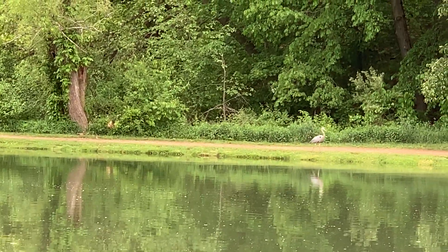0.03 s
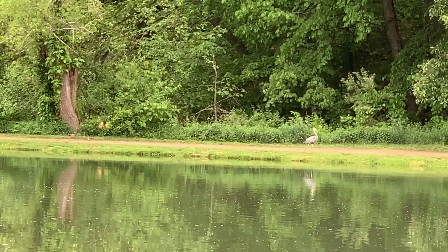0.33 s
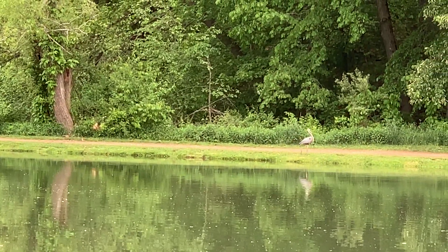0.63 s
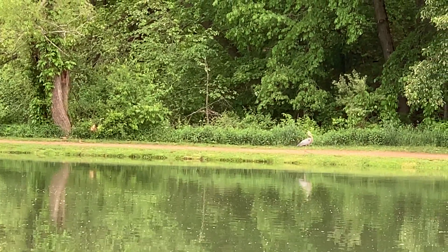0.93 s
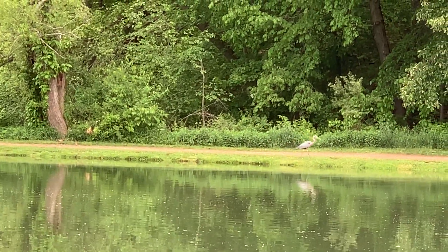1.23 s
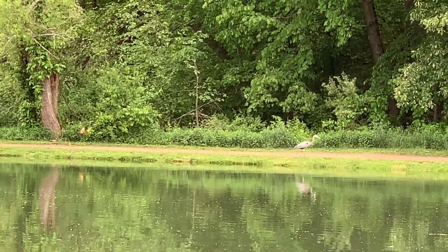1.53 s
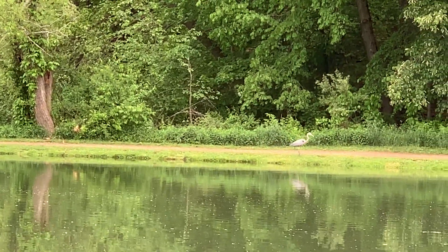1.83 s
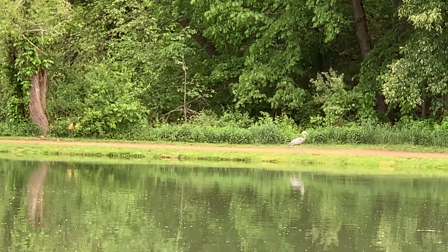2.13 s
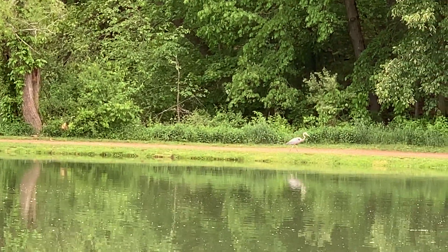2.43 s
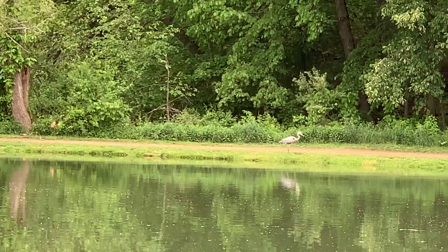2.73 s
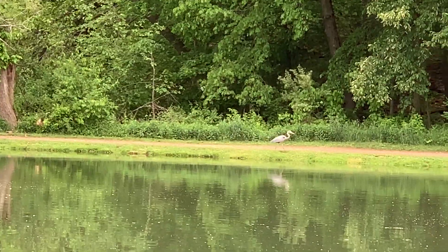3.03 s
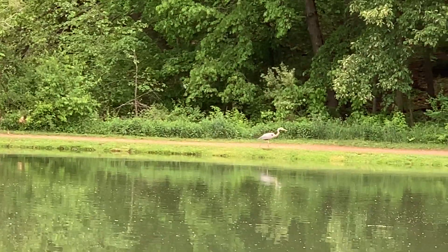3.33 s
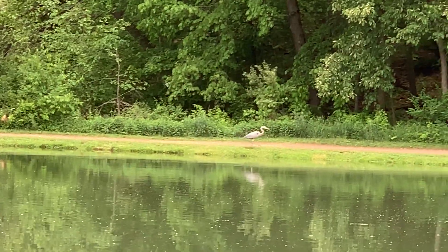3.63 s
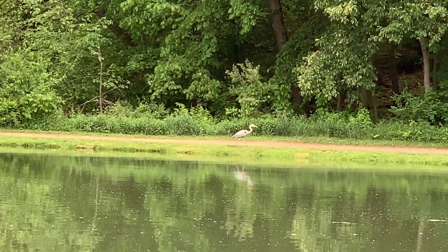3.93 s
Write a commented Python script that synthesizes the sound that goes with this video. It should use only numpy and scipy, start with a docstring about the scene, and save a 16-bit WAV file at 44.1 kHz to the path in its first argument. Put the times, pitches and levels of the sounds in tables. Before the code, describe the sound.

Faint woodland birdsong and a single sharp nearby chirp above soft, far-off traffic rumble.

```python
"""A quiet pond at the edge of a wood, with the low rumble of a distant town and a faint engine drone.
Birds whistle, twitter and trill deep in the trees, and a songbird slurs a short phrase in gliding tones.
One close bird gives a sharp chip, sounding both sides of its voice box at once.
Leaves and trunks scatter every call; two closely spaced microphones pick it all up."""
import sys
import numpy as np
from scipy import signal
from scipy.fft import rfft, irfft
from scipy.io import wavfile
from scipy.ndimage import uniform_filter1d

SR = 44100
rng = np.random.default_rng(int(sys.argv[2]) if len(sys.argv) > 2 else 0)


def transcribe(u):
    """Save the signal u as a 16-bit wav file named by the first command-line argument.

    u: samples, shape (n,) or (channels, n), limited to [-1, 1]; the rate is SR.
    q: integer samples, one column per channel.
    """
    v = np.clip(np.atleast_2d(u).T, -1, 1)
    q = np.round(v * 32767).astype(np.int16)
    wavfile.write(sys.argv[1], SR, q)


N = 4 * SR
TIME = np.arange(N) / SR


def undb(db):
    """Decibels to gain."""
    return 10 ** (np.asarray(db) / 20)


def drift(rate_hz):
    """Smooth random drift with a spread near 1."""
    hold = max(int(SR / rate_hz), 1)
    steps = np.repeat(rng.standard_normal(N // hold + 1), hold)
    return 1.3 * uniform_filter1d(uniform_filter1d(steps, hold), hold)[:N]


def sine(hz, db):
    """A tone that follows a pitch curve, at an RMS level in dB."""
    return np.sqrt(2) * undb(db) * np.sin(2 * np.pi * np.cumsum(hz) / SR)


def swell(start, length):
    """A round-shouldered fade in and out."""
    progress = np.clip((TIME - start) / length, 0, 1)
    return np.sqrt(np.abs(np.sin(np.pi * progress)))


def over_hz(points):
    """A table read at every frequency, on a log axis."""
    hz, value = np.array(points).T
    return np.interp(np.log(np.arange(N // 2 + 1) * SR / N + 1e-9), np.log(hz), value)


def place(x, lag_s, pan_db=0):
    """A direction: positive values reach the right microphone later and weaker."""
    return np.array([x * undb(pan_db / 2), np.roll(x, round(lag_s * SR)) * undb(-pan_db / 2)])


def scatter(x, t60_s, onset_s):
    """Countless small echoes from leaves and trunks, different at each microphone."""
    envelope = np.exp(-np.log(1000) * TIME / t60_s) * (1 - np.exp(-TIME / onset_s))
    echoes = rng.standard_normal((2, N)) * envelope
    echoes /= np.sqrt(np.sum(echoes ** 2, axis=1, keepdims=True))
    return signal.fftconvolve(x[None], echoes, axes=1)[:, :N]


# Stereo width of the beds. Each row: frequency in Hz, left-right correlation.
STEREO_LIKENESS = [(60, 0.92), (110, 0.8), (200, 0.51), (320, 0.31), (480, -0.28), (700, -0.069),
                   (950, -0.54), (1450, -0.53), (1900, 0.18), (2600, -0.15), (6000, -0.046)]

def wash(spectrum):
    """Stereo noise of a given colour at unit level, arriving from all around."""
    alike = over_hz(STEREO_LIKENESS)
    coloured = rfft(rng.standard_normal((2, N))) * undb(over_hz(spectrum))
    mid, side = coloured * np.sqrt([1 + alike, 1 - alike])
    bed = irfft(np.array([mid + side, mid - side]), N)
    return bed / bed.std()


# Colour of the air bed. Each row: frequency in Hz, relative level in dB.
AIR_COLOUR = [(150, -11.5), (400, -1), (600, -1.5), (830, 0.5), (1300, -3.5), (1800, -9.5), (2500, -12.5),
              (3500, -17.5), (5000, -25), (7000, -32.5), (9500, -34), (13500, -35.5), (16000, -20.5)]

def air():
    """The smooth hush over the pond, gently rising and falling."""
    return wash(AIR_COLOUR) * undb(-61 + 1.5 * drift(2.08))


def engine_tone(hz, db):
    """One engine line, wavering in pitch and level on its long way."""
    wavering_db = db + 3.63 * drift(4.026)
    return sine(hz * (1 + 0.00592 * drift(3.002)), wavering_db)


# The constant low drone. Each row: pitch in Hz, relative level in dB.
ENGINE_DRONE = [(61.5, -65), (80.7, -53.5), (102, -61)]
# A higher hum that comes and goes. Each row: start and end in seconds, pitch in Hz, relative level in dB.
ENGINE_HUM = [(0.45, 3.3, 257, -66), (2.2, 3.45, 270, -63.5), (0.57, 3.2, 298, -70), (3.7, 3.72, 230, -66)]

def engines():
    """Distant engines: a low drone with hums fading in and out above it."""
    drone = sum(engine_tone(hz, db) for hz, db in ENGINE_DRONE)
    hum = sum(engine_tone(hz, db) * swell(start, end - start) for start, end, hz, db in ENGINE_HUM)
    return drone + hum


# Colour of the traffic bed. Each row: frequency in Hz, relative level in dB.
RUMBLE_COLOUR = [(15, -51), (25, -22.5), (40, -13), (58, 1.5), (76, -2), (104, -2.5), (135, -8.5),
                 (175, -13.5), (200, -10.5), (232, -16), (268, -14.5), (335, -23), (480, -27), (900, -66.5)]
# Fader ride on the whole town. Each row: time in seconds, gain in dB.
TOWN_FADER = [(0, -2), (.7, -1), (1.1, 0.8), (1.5, 0), (2, 0), (2.8, -0.7), (3.4, -0.7), (4, -1)]

def town():
    """Far traffic rumbling under the engines, a little to the right."""
    drone = engines()
    rumble = wash(RUMBLE_COLOUR) * undb(-46.5 + 1.25 * drift(3.01))
    fader = undb(np.interp(TIME, *np.array(TOWN_FADER).T))
    pan = undb([[-1.75], [1.75]])
    return (rumble + drone) * fader * pan


def sing(notes, waver):
    """Bird notes that swell and fade while the pitch bends through three points and flutters."""
    voice = np.zeros(N)
    flutter = 1 + waver * drift(300)
    for start, length, first, middle, last, db in notes:
        on = (TIME >= start) & (TIME < start + length)
        progress = (TIME[on] - start) / length
        bend = np.polyfit([0, .5, 1], [first, middle, last], 2)
        hz = np.polyval(bend, progress) * flutter[on]
        voice[on] += np.sin(np.pi * progress) * sine(hz, db)
    return voice


# Rapid far trills; the first run is a broad, fluttering wash of echo around the songbird's phrase.
# Each row: start and length in seconds, lowest and highest pitch in Hz, relative level in dB.
FLUTTER_RUNS = [(0.127, 0.24, 2540, 4900, -68), (0.347, 0.21, 5350, 6200, -82), (.64, .14, 4980, 6900, -81),
                (0.737, 0.19, 3670, 6700, -77), (1.297, 0.12, 3870, 6180, -81.5),
                (2.86, 0.1, 3505, 5620, -76), (3.385, 0.31, 2410, 4790, -76),
                (3.66, .34, 3306, 4800, -78.5), (3.73, 0.09, 5400, 6080, -81),
                (3.87, 0.055, 5650, 6250, -79.5), (3.884, 0.1, 2106, 3204, -67.5)]

def flutter_runs():
    """Runs of tiny falling notes, too quick and uneven to tell apart; each run swells and fades."""
    notes_per_s = 60 * (1 + .3 * drift(50))
    note_progress = np.cumsum(notes_per_s) / SR % 1
    pulses = np.sqrt(2) * np.sin(np.pi * note_progress)
    voice = np.zeros(N)
    for start, length, low, high, db in FLUTTER_RUNS:
        hz = high + (low - high) * note_progress
        voice += swell(start, length) * pulses * sine(hz, db)
    return voice


# Whistles deep in the wood, thin treetop twitter, and short falling chirps and high ticks.
# Each row: start and length in seconds, first, middle and last pitch in Hz, relative level in dB.
WHISTLE_NOTES = [(.17, 0.095, 2950, 2637, 2400, -66), (.35, 0.087, 3100, 2750, 2380, -68.5),
                 (.5, .05, 3100, 2660, 3020, -67.5), (.66, 0.065, 3000, 3040, 3060, -72.5),
                 (.89, 0.14, 2800, 2954, 3060, -68), (1.16, .1, 2150, 1947, 1790, -69),
                 (1.24, 0.12, 2750, 2826, 2900, -72), (1.72, 0.093, 3050, 3390, 3500, -74.5),
                 (2.2, 0.071, 3100, 2950, 2720, -80), (2.65, 0.11, 2950, 2830, 2550, -80),
                 (2.78, .12, 2450, 2257, 2190, -72), (3.23, .15, 3350, 3045, 2745, -71.5),
                 (3.4, .11, 2600, 2990, 3680, -70.5), (3.56, 0.058, 2300, 2370, 2270, -73),
                 (3.63, 0.044, 2920, 2920, 2920, -70), (3.74, .17, 2850, 3040, 3034, -73)]
TWITTER_NOTES = [(0, .025, 5900, 4550, 2500, -62), (0.058, 0.062, 5700, 4800, 3900, -73),
                 (.565, 0.042, 5680, 5600, 5300, -74), (.27, .06, 5700, 4800, 4000, -75),
                 (1.355, 0.046, 3310, 3700, 3950, -71)]
TICK_NOTES = [(.44, 0.025, 9300, 8250, 7300, -82), (1.23, .06, 8770, 6850, 4450, -83),
              (2.18, .05, 10500, 8060, 5360, -82.5), (2.21, 0.026, 6850, 6270, 5700, -81),
              (2.3, .017, 8000, 6270, 4230, -80), (2.303, 0.025, 3430, 2790, 2100, -69.5),
              (3.155, 0.038, 10000, 6750, 4300, -81.5), (3.665, .03, 4550, 4130, 3400, -73),
              (3.79, 0.038, 4450, 4050, 3400, -73.5), (3.848, 0.02, 4680, 4350, 3950, -72.5),
              (3.866, .016, 5500, 5420, 5350, -75), (3.93, .035, 4350, 3950, 3300, -70)]

def far_birds():
    """Distant calls and the wash around the song, blurred by leaves and wood; ticks get a short tail."""
    whistles = sing(WHISTLE_NOTES, waver=.0403)
    twitter = sing(TWITTER_NOTES, waver=.032)
    voices = undb(2) * (whistles + twitter) + undb(-.5) * flutter_runs()
    ticks = undb(3.5) * sing(TICK_NOTES, waver=.05)
    direct = undb(-8.5) * place(voices + ticks, lag_s=0.00019)
    leaves = undb(-5) * scatter(voices, t60_s=0.093, onset_s=0.0013)
    wood = undb(-.5) * scatter(voices, t60_s=0.91, onset_s=0.0025)
    tick_tail = scatter(ticks, t60_s=0.25, onset_s=0.00093)
    return direct + leaves + wood + tick_tail


# The songbird's phrase and a few later notes.
# Each row: start and length in seconds, first, middle and last pitch in Hz, relative level in dB.
SONG_NOTES = [(.034, 0.018, 3100, 3530, 4450, -61.5), (.084, 0.032, 4710, 4220, 3850, -59),
              (.113, 0.0144, 3800, 3460, 3220, -52.5), (.123, 0.027, 3250, 3110, 3220, -62),
              (.199, 0.041, 2726, 3150, 3020, -58.5), (.251, 0.029, 3067, 3355, 3730, -57.5),
              (.281, .017, 3900, 3424, 3120, -55.5), (.297, .018, 3230, 3524, 4120, -59),
              (1.334, 0.0355, 2757, 3070, 3100, -60.5), (1.366, 0.022, 3060, 2720, 2570, -60.5),
              (3.318, 0.054, 3110, 3000, 2920, -67)]

def songbird():
    """Quick slurs from the right, answered by the wood."""
    voice = sing(SONG_NOTES, waver=.012)
    wood = undb(-1.5) * scatter(voice, t60_s=1, onset_s=0.0055)
    return place(voice, lag_s=-0.00031, pan_db=-3) + wood


def syrinx(curve):
    """One side of a bird's voice box: a slightly rough gliding tone."""
    seconds, hz, db = np.array(curve).T
    rough_hz = np.interp(TIME, seconds, hz) * (1 + 0.025 * drift(1500))
    gate = (TIME > seconds[0]) & (TIME < seconds[-1])
    return gate * sine(rough_hz, np.interp(TIME, seconds, db))


# Glides of the chip's two voices. Each row: time in seconds, pitch in Hz, relative level in dB.
UPPER_VOICE = [(2.497, 3750, -68), (2.499, 3720, -48), (2.504, 3700, -48), (2.507, 4000, -43),
               (2.5095, 4500, -43), (2.5145, 5000, -41), (2.516, 5600, -43), (2.519, 5800, -43),
               (2.522, 5500, -42), (2.5245, 4450, -38), (2.529, 3700, -50)]
LOWER_VOICE = [(2.508, 3600, -56), (2.512, 3950, -38), (2.5145, 3650, -46), (2.516, 3800, -39),
               (2.519, 4100, -37), (2.522, 3850, -40), (2.524, 3500, -58)]

def close_chip():
    """Two voices at once make a difference tone, rasp and bright hiss; bushes and wood echo the call."""
    voice = undb(-4) * (syrinx(UPPER_VOICE) + syrinx(LOWER_VOICE))
    # Squaring mixes the voices; the band-pass keeps their difference tone.
    difference_band = signal.butter(2, [1100, 3200], "bandpass", fs=SR, output="sos")
    difference_tone = undb(32.5) * signal.sosfilt(difference_band, voice ** 2)
    rasp = 1 + undb(-7) * drift(3100)
    call = voice * rasp + difference_tone
    hiss = undb(-21) * voice * rng.standard_normal(N)
    middle_register = signal.lfilter(*signal.iirpeak(4750, Q=6, fs=SR), call)
    direct = place(call + 0.41 * hiss, lag_s=0.00019)
    bushes = undb(-5) * scatter(call, t60_s=0.093, onset_s=0.0067)
    hiss_tail = scatter(hiss, t60_s=0.15, onset_s=0.0011)
    wood = undb(-8.5) * scatter(middle_register, t60_s=0.61, onset_s=0.011)
    return direct + bushes + hiss_tail + wood


def scene():
    """Birds over the hush of the pond and the distant town."""
    return town() + air() + songbird() + far_birds() + close_chip()


def record(dry):
    """The microphone ports ring a little in the treble; the recorder cuts the top."""
    ring = undb(-6) * signal.lfilter(*signal.iirpeak(8130, Q=32, fs=SR), dry)
    top_cut = signal.ellip(10, .2, 70, 14400, fs=SR, output="sos")
    return signal.sosfilt(top_cut, dry + ring)


dry = scene()
out = record(dry)
transcribe(out)
```